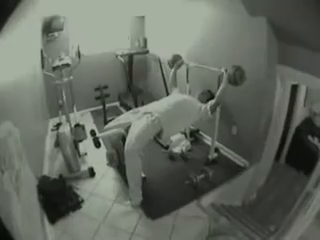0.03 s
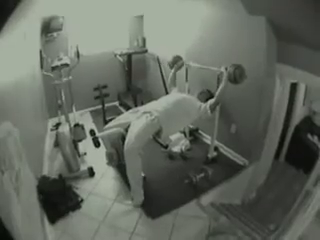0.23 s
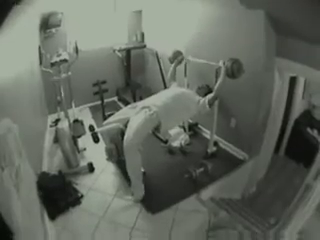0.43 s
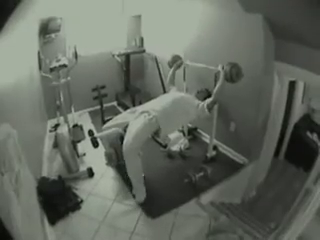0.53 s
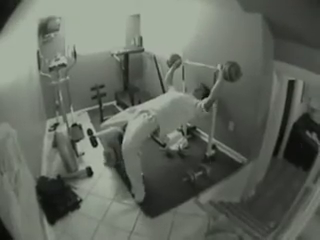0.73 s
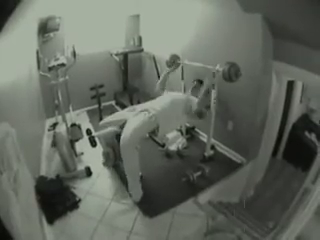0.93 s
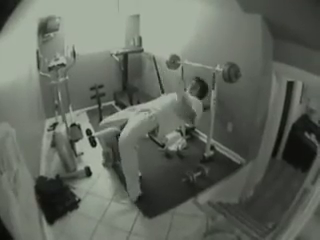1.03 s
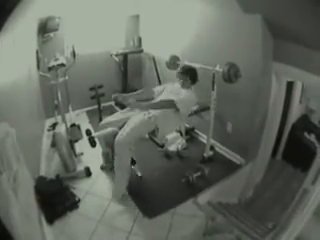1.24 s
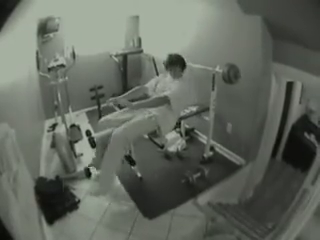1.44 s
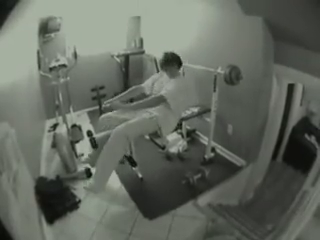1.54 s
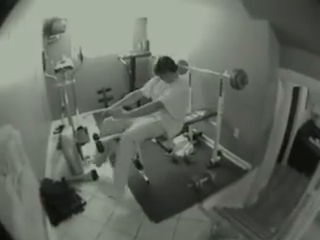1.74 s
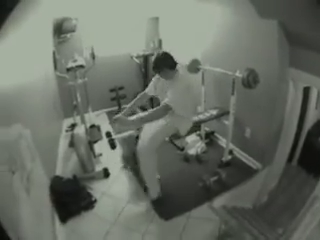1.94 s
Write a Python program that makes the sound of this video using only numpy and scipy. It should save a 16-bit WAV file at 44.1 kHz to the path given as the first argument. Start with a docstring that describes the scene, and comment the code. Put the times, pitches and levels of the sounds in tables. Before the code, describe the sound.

A loaded barbell drops onto a steel bench rack with a loud, ringing clatter of loose plates. Small clicks follow, clothes rustle, a shoe scuffs and a foot lands with a dull thud in a small, hard-walled room.

```python
"""A small, hard-walled room with a bench rack: a loaded barbell is dropped onto the hooks.
Bar and loose plates bang several times, the steel frame rings, and the collars click as they settle.
The lifter sits up, clothes dragging on the bench, scuffs a faintly squeaking sole over the floor
and plants the foot with a thud. Room air and a low hum lie underneath."""
import sys
import numpy as np
from scipy import signal
from scipy.fft import rfft, irfft, next_fast_len
from scipy.io import wavfile
from scipy.ndimage import map_coordinates

SR = 44100
rng = np.random.default_rng(int(sys.argv[2]) if len(sys.argv) > 2 else 0)


def dump_mix(stems):
    """Bounce the given channels to the path in sys.argv[1] as a 16-bit WAV at rate SR."""
    frames = np.atleast_2d(stems).T  # one column per channel
    limited = np.clip(frames, -1, 1)  # hard clip at full scale
    pcm = np.round(limited * 32767).astype(np.int16)
    wavfile.write(sys.argv[1], SR, pcm)


N = 88200

# stereo image, widening towards the treble (frequency [Hz], left-right correlation [0..1])
STEREO_LIKENESS = [(40, 1), (150, 1), (500, 0.86), (2000, 0.72), (4000, 0.83), (8000, 0.57), (13000, 0.22)]


def amp(db):
    """Decibels to gain."""
    return 10 ** (np.asarray(db) / 20)


def unit(x):
    """Scale to rms 1."""
    return x / np.sqrt(np.mean(x ** 2) + 1e-20)


def along(points, hz):
    """Read a (frequency [Hz], value) curve on a log frequency axis."""
    freqs, values = np.transpose(points)
    return np.interp(np.log(hz + 1), np.log(freqs + 1), values)


def wobble(per_s):
    """Smooth random modulation with per_s knots a second."""
    return map_coordinates(rng.standard_normal(4096), [np.arange(N) * per_s / SR], mode="wrap")


def filtered(x, response):
    """Equalise x with the gain curve response(hz)."""
    size = next_fast_len(N + SR // 4)
    return irfft(rfft(x, size) * response(np.fft.rfftfreq(size, 1 / SR)), size)[..., :N]


def noise(tone):
    """Stereo noise of rms 1, coloured by tone(hz) in dB, narrow in the bass and wide on top."""
    def response(hz):
        spread = np.arccos(along(STEREO_LIKENESS, hz)) / 2
        return amp(tone(hz)) * [np.cos(spread), np.sin(spread)]
    mid, side = filtered(rng.standard_normal((2, N)), response)
    return unit(np.array([mid + side, mid - side]))


def decay(x, t60_curve):
    """The first 0.7 s of x, each frequency dying away at its own speed."""
    hz, t, spectra = signal.stft(x[:, :SR * 7 // 10], SR, nperseg=256)
    fade = amp(-60 * t / along(t60_curve, hz)[:, None])
    return signal.istft(spectra * fade, SR, nperseg=256)[1]


def add(track, start_s, sound):
    """Mix a sound into the track at start_s."""
    start = round(start_s * SR)
    part = sound[:, :N - start]
    track[:, start:start + part.shape[1]] += part


def ring(modes, attack_s=0.00021):
    """A struck body: decaying sines that vary in strength per hit, and in phase per hit and side."""
    t, out = np.arange(SR) / SR, np.zeros((2, SR))
    for hz, db, t60 in modes:
        spread = np.arccos(along(STEREO_LIKENESS, hz)) * rng.standard_normal() / 2
        phase = rng.uniform(0, 2 * np.pi) + np.array([[spread], [-spread]])
        envelope = amp(db + rng.standard_normal() - 60 * t / t60)
        out += envelope * np.sin(2 * np.pi * hz * t + phase)
    return out * (1 - np.exp(-t / attack_s))


def room(x, wet_db):
    """Hard walls close by add a short, diffuse tail."""
    # reverb decay (frequency [Hz], t60 [s])
    tail_t60 = [(100, 0.25), (500, 0.56), (2000, 0.65), (6000, 0.59), (13000, 0.42)]
    build_up_s = 0.0024
    tail = decay(noise(np.zeros_like), tail_t60)
    t = np.arange(tail.shape[1]) / SR
    tail *= 1 - np.exp(-(t / build_up_s) ** 2)
    tail /= np.linalg.norm(tail[0])
    return x + amp(wet_db) * signal.fftconvolve(x, tail, axes=1)[:, :N]


def plate_clatter(band_db):
    """Loose plates chatter within one blow: a fluttering noise burst, shaped by four band levels."""
    # centres of the bass, middle, bite and treble bands (frequency [Hz])
    band_hz = (280, 900, 2500, 6000)
    # colour of the plates (frequency [Hz], level [dB])
    plate_tone = [(40, -21), (110, -16), (170, -6.5), (240, -1.5), (350, 0), (520, -4), (750, 2.5),
                  (1100, -2), (1450, -3), (2500, -7), (3200, -5.5), (5000, -8), (8000, -17), (9400, -24.5),
                  (14500, -37.5)]
    # damping of the plates (frequency [Hz], t60 [s])
    plate_t60 = [(150, 0.39), (1000, .2), (4000, 0.22), (12000, 0.23)]
    blow_eq = list(zip(band_hz, band_db))
    plates = filtered(noise(lambda hz: along(plate_tone, hz)), lambda hz: amp(along(blow_eq, hz)))
    chatter = unit(amp(3.5 * wobble(per_s=269)))
    return amp(3) * decay(plates * chatter, plate_t60)


def barbell():
    """Each blow pings on the hook, shakes the plates and sets frame and bar ringing."""
    # bar and plates striking the rack
    # (time [s], bass [dB], middle [dB], bite [dB], treble [dB], frame ring [dB], bar ring [dB])
    blows = [(0.0, -24.5, -28, -35, -44, -58, -54), (0.021, -50, -34.5, -32, -82, -63, -46.5),
             (0.084, -33, -37, -71, -71, -48, -71), (0.1514, -16.5, -10.5, -13.5, -20, -20, -26.5),
             (0.199, -41, -20, -23, -27.5, -31.5, -42), (0.2548, -48, -18, -21, -38, -51, -27.5),
             (0.2965, -16.5, -13.5, -13.5, -15.5, -29, -37),
             (0.3190, -20, -18.5, -22.5, -26.5, -17.5, -28.5), (0.344, -35, -16, -23.5, -28.5, -29, -30),
             (0.3742, -22.5, -21, -15.5, -21, -24, -25), (0.4063, -19.5, -16.5, -12.5, -21, -22, -31.5),
             (0.421, -28, -25, -30, -29, -27, -27), (0.4501, -23, -16, -16.5, -13.5, -43, -19.5),
             (0.461, -35, -20, -31, -30, -36, -15.5), (0.487, -36, -13.5, -15.5, -22.5, -29, -20.5),
             (0.502, -16.5, -21.5, -29, -27, -20, -30), (0.525, -22, -16.5, -16.5, -28.5, -33, -44),
             (0.553, -27, -23, -16, -27, -28.5, -24.5), (0.585, -22.5, -35, -22.5, -30, -23, -32),
             (0.643, -26.5, -27, -31, -46, -24, -44)]
    # short ping of steel on the hook (frequency [Hz], level [dB], t60 [s])
    ping_modes = [(2448, 3, 0.032)]
    # steel frame (frequency [Hz], level [dB], t60 [s])
    frame_modes = [(165, -16.5, 0.32), (240.8, -5, 0.39), (255, -18.5, .2), (323.5, -3, 0.22),
                   (352, 2, 0.17), (367.4, -8.5, 0.47), (425.2, -6, 0.26), (602.4, -9.5, 0.91),
                   (658, -6, 0.64), (767, -2, 0.22), (798, -2.5, 0.23), (967, -5, 0.11), (1009.5, -4, 0.27),
                   (1202, -7, 0.6)]
    # loaded bar (frequency [Hz], level [dB], t60 [s])
    bar_modes = [(1788, -2.5, 0.39), (1866.3, 5, 0.27), (2122, -8, 0.35), (2520, -14, 0.26),
                 (2575, -18, 0.74), (2662, -7, 0.6), (3258, -18, 1), (3730, -7, .45), (3740, -15, 0.35),
                 (3970, -7.5, 0.27), (4120, -15, .3), (6083, -14.5, 0.27), (7750, -24, 0.32),
                 (8020, -23.5, 0.47)]
    # hook, ringing at the start from a light touch of the bar (frequency [Hz], level [dB], t60 [s])
    hook_modes = [(239, -29.5, 0.18), (458, -33, 0.31), (932, -32, 0.18), (1870, -31, 0.18),
                  (2460, -38.5, 0.15), (3160, -47, 0.27), (3467, -39.5, 0.31)]
    ping_pivot_db, ping_expansion = -17, 0.53  # blows with more bite ping disproportionately
    hits, rings = np.zeros((2, N)), np.zeros((2, N))
    for start_s, bass, middle, bite, treble, frame_db, bar_db in blows:
        add(hits, start_s, plate_clatter((bass, middle, bite, treble)))
        ping_db = bite + ping_expansion * (bite - ping_pivot_db)
        add(hits, start_s, amp(ping_db) * ring(ping_modes))
        add(rings, start_s, amp(frame_db) * ring(frame_modes) + amp(bar_db) * ring(bar_modes))
    add(rings, 0, ring(hook_modes))
    low_cut = signal.butter(2, 147, "high", fs=SR, output="sos")  # keeps the clangs free of low thumps
    return signal.sosfilt(low_cut, room(hits, wet_db=-3.5) + rings)


def room_tone():
    """A bed of air with a hum that wavers in level and phase."""
    # colour of the air (frequency [Hz], level [dB])
    air_tone = [(15, -41), (25, -15.5), (54, -4), (86, -14), (186, -5.5), (237, -12.5), (293, -7),
                (415, -9), (790, -16.5), (1500, -21), (1910, -17), (2430, -28), (2850, -22), (15000, -41.5)]
    # hum partials (frequency [Hz], level [dB])
    partials = [(52, -56.5), (292, -50.5)]
    t, hum = np.arange(N) / SR, np.zeros(N)
    for hz, db in partials:
        level = np.sqrt(2) * amp(db + 1.6 * wobble(per_s=8.24))
        drift = 0.5 * wobble(per_s=7.35)
        hum += level * np.sin(2 * np.pi * hz * t + drift)
    return amp(-45.5) * noise(lambda hz: along(air_tone, hz)) + hum


def taps(contacts, tone, t60_s, attack_s):
    """Short contacts that do not ring: one noise burst each."""
    t, out = np.arange(N) / SR, np.zeros((2, N))
    for start_s, db in contacts:
        envelope = amp(db - 60 * t / t60_s) * (1 - np.exp(-t / attack_s))
        add(out, start_s, envelope * noise(lambda hz: along(tone, hz)))
    return out


def collar_clicks():
    """Collars and fittings settle, each with a sharp snap and a short rasp."""
    # small metal contacts (time [s], level [dB])
    clicks = [(0.7827, -25.5), (0.795, -33), (1.2406, -32.5), (1.3783, -41.5), (1.5849, -30.5),
              (1.8632, -45), (1.8862, -46), (1.9635, -38.5)]
    # colour of a click (frequency [Hz], level [dB])
    click_tone = [(300, 6), (1500, 5.5), (4500, -1), (8000, -1), (13000, -7), (15000, -37)]
    rasp = taps(clicks, click_tone, t60_s=0.056, attack_s=0.00021)
    snap = taps(clicks, click_tone, t60_s=0.0045, attack_s=0.0001)
    return room(amp(-3) * rasp + amp(4) * snap, wet_db=-1.5)


def rubbing(movement, tone):
    """Friction noise that follows a level curve, with about 1 dB of uneven grain."""
    level_db = np.interp(np.arange(N) / SR, *np.transpose(movement), left=-100)
    return amp(level_db) * unit(noise(tone) * amp(wobble(per_s=76)))


def clothes_rustle():
    """Clothes drag on the bench as the lifter sits up."""
    # swell of the drag (time [s], level [dB])
    drag = [(0.95, -65), (1.02, -47), (1.045, -38), (1.15, -40), (1.28, -42), (1.34, -46), (1.45, -58),
            (1.52, -40.5), (1.59, -39), (1.68, -38.5), (2.0, -63)]
    # colour of the fabric (frequency [Hz], level [dB])
    cloth_tone = [(88, -59), (150, -14.5), (289, -5), (324, -21), (556, -6.5), (674, -14.5), (787, -9),
                  (3540, -17.5), (12100, -37), (15000, -64)]
    return rubbing(drag, lambda hz: along(cloth_tone, hz))


def shoe_scuff():
    """The sole slides over the floor: broad friction noise and a faint squeak of narrow noise bands."""
    # swell of the slide (time [s], level [dB])
    slide = [(1.47, -47), (1.54, -64), (1.595, -31), (1.645, -38.5), (1.69, -42), (1.82, -40.5),
             (1.88, -45), (2.0, -45)]
    # colour of the slide (frequency [Hz], level [dB])
    slide_tone = [(180, -34), (300, 1), (423, -2), (490, -7), (1250, -5.5), (1370, -21), (1620, -4),
                  (3020, -8.5), (4250, -13), (12500, -32.5), (15000, -53)]
    # swell of the squeak (time [s], level [dB])
    squeak = [(1.48, -64), (1.56, -39), (1.64, -35.5), (1.69, -43), (1.82, -47.5), (1.9, -56), (2.0, -55)]
    # peaks of the squeak (frequency [Hz], half-width [Hz], level [dB])
    peaks = [(1650, 90, -14), (2180, 110, -3.5), (2960, 92, -2)]

    def squeak_tone(hz):
        gain = sum(amp(db) / (1 + ((hz - centre) / width) ** 2) for centre, width, db in peaks)
        return 20 * np.log10(gain)
    return rubbing(slide, lambda hz: along(slide_tone, hz)) + rubbing(squeak, squeak_tone)


def footfall():
    """Heel and sole land with dull thuds that set the floor ringing briefly."""
    # landings (time [s], level [dB])
    thuds = [(1.677, -26.5), (1.694, -19), (1.710, -19), (1.73, -18.5), (1.763, -28), (1.786, -29)]
    # colour of a thud (frequency [Hz], level [dB])
    thud_tone = [(30, -10), (60, -10), (100, -16), (130, -16), (175, -1.5), (230, -4), (400, -7),
                 (750, -10.5), (1300, -28.5), (4000, -49), (12000, -67)]
    # floor under the foot (frequency [Hz], level [dB], t60 [s])
    floor_modes = [(102, -6.5, 0.1), (175.8, 0.5, 0.17), (209, 3, 0.063), (320, -1.5, 0.054)]
    attack_s = 0.0024
    foot = taps(thuds, thud_tone, t60_s=0.092, attack_s=attack_s)
    for start_s, db in thuds:
        add(foot, start_s, amp(db) * ring(floor_modes, attack_s))
    return room(foot, wet_db=-8)


def scene():
    """All layers, leaning to the left, most of all in the bass."""
    # pan (frequency [Hz], left over right [dB])
    balance = [(60, 12.5), (300, 9), (700, 6), (1400, 3), (3000, 2), (6000, 3), (12000, 0.8)]
    # phase between the sides (frequency [Hz], left lead [rad])
    lead = [(100, 0.5), (860, -.45), (2900, 0.46), (7000, 0.5), (9100, -2.5), (11000, -2), (12500, 0.5)]
    sides = np.array([[0.5], [-0.5]])
    mix = barbell() + room_tone() + collar_clicks() + clothes_rustle() + shoe_scuff() + footfall()
    return filtered(mix, lambda hz: amp(sides * along(balance, hz)) * np.exp(1j * sides * along(lead, hz)))


def record(dry):
    """Soft clipping rounds off the highest peaks, then the very top is cut away."""
    # treble roll-off (frequency [Hz], gain [dB])
    roll_off = [(13600, 0), (14500, -13), (15200, -18)]
    ceiling, top_hz = 1.05, 15200
    rounded = dry / (1 + np.abs(dry / ceiling) ** 4) ** (1 / 4)
    return filtered(rounded, lambda hz: amp(along(roll_off, hz)) * (hz < top_hz))


dry = scene()
out = record(dry)
dump_mix(out)
```